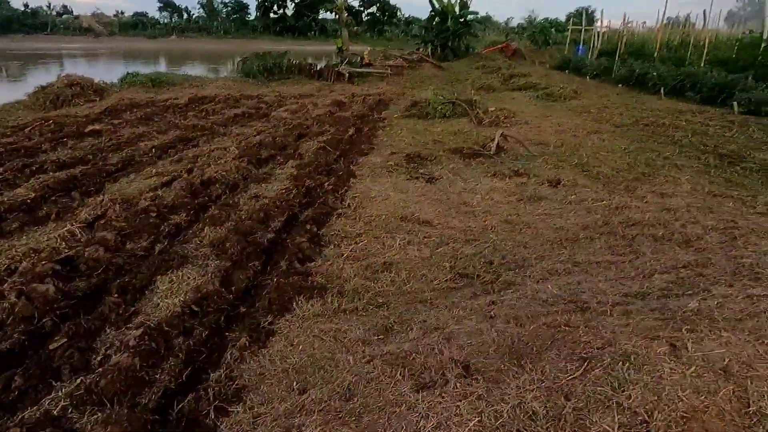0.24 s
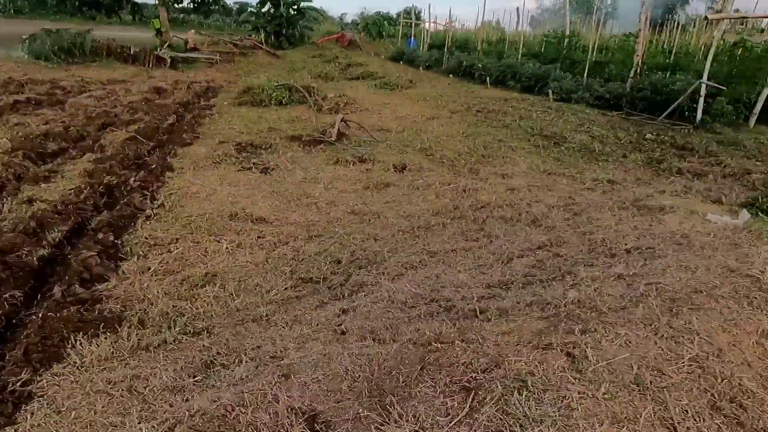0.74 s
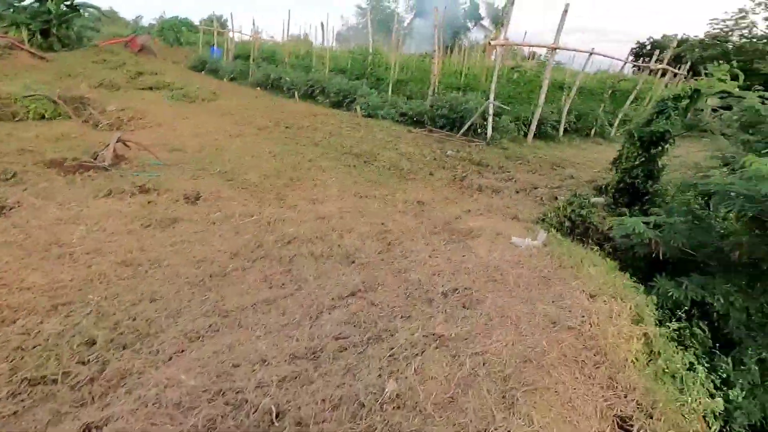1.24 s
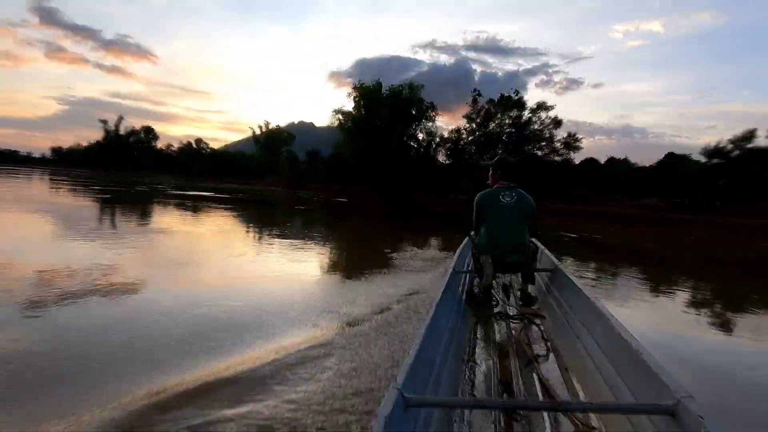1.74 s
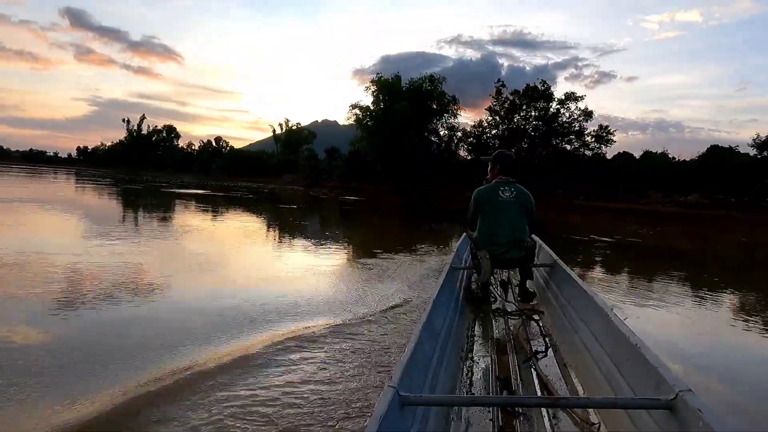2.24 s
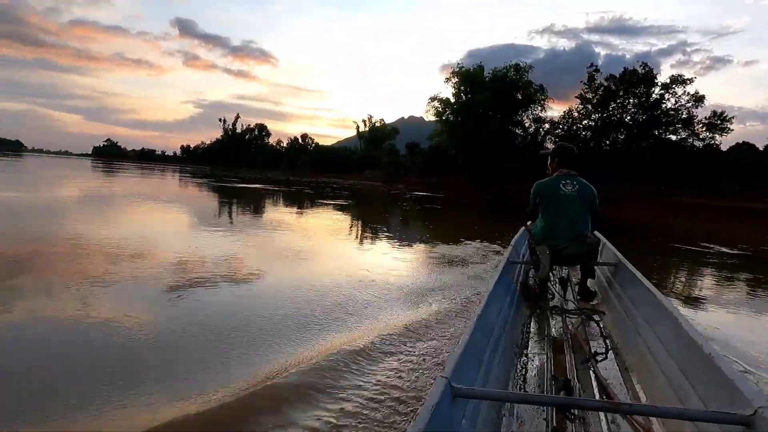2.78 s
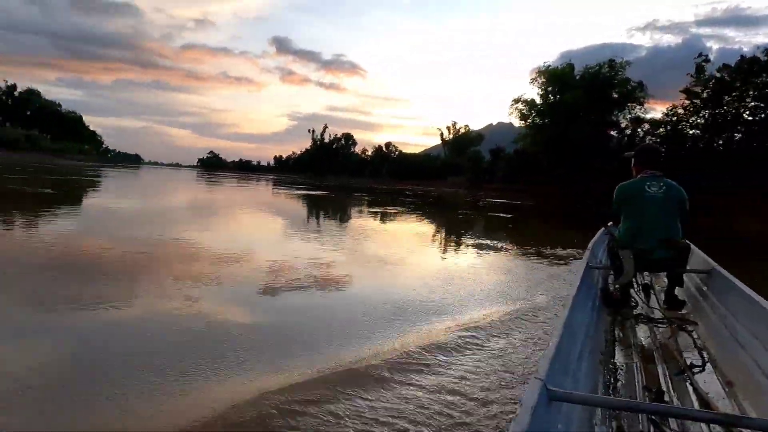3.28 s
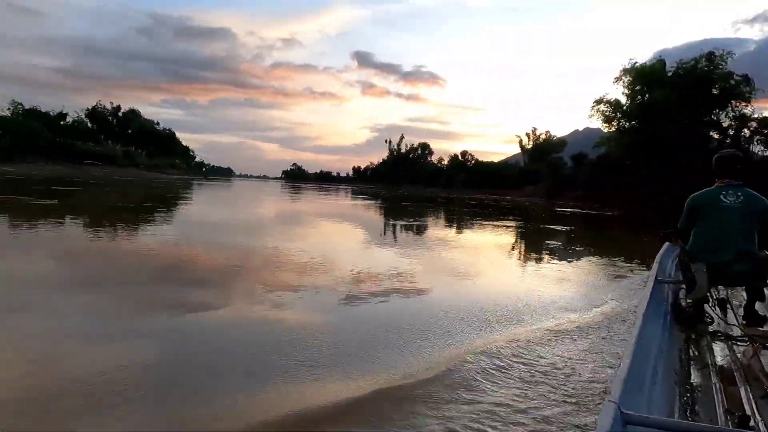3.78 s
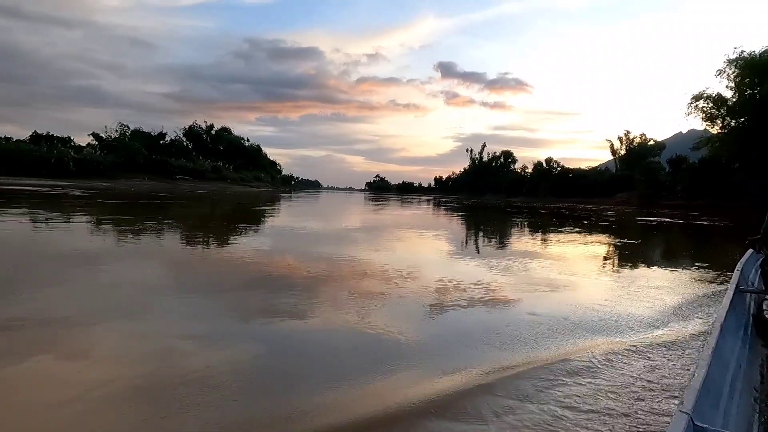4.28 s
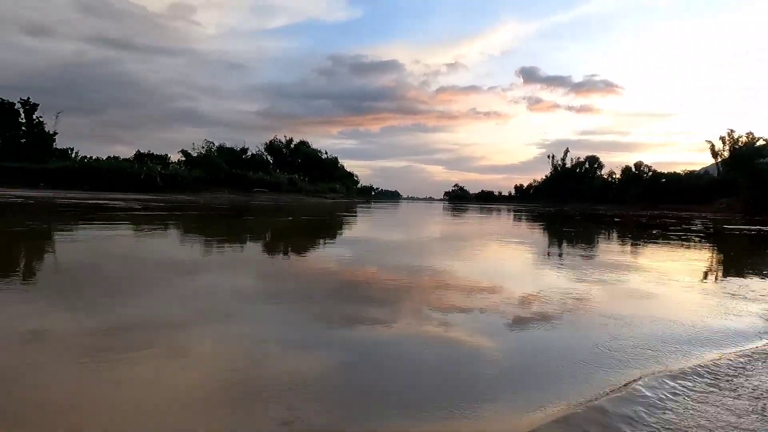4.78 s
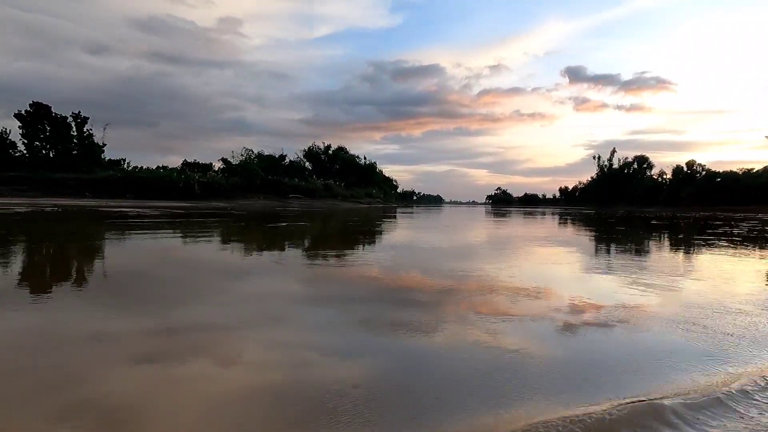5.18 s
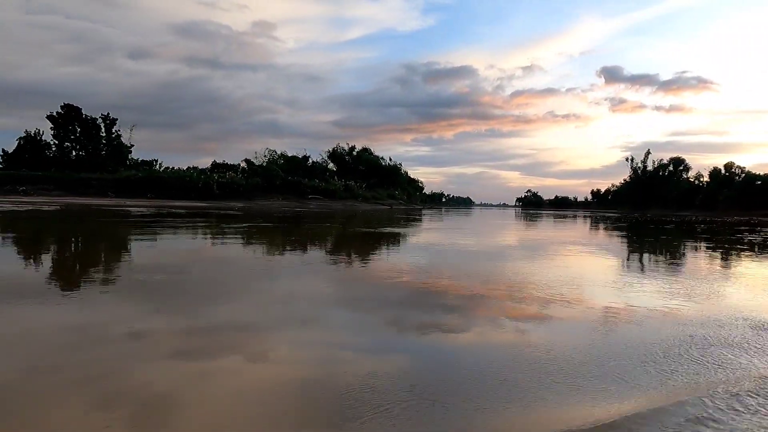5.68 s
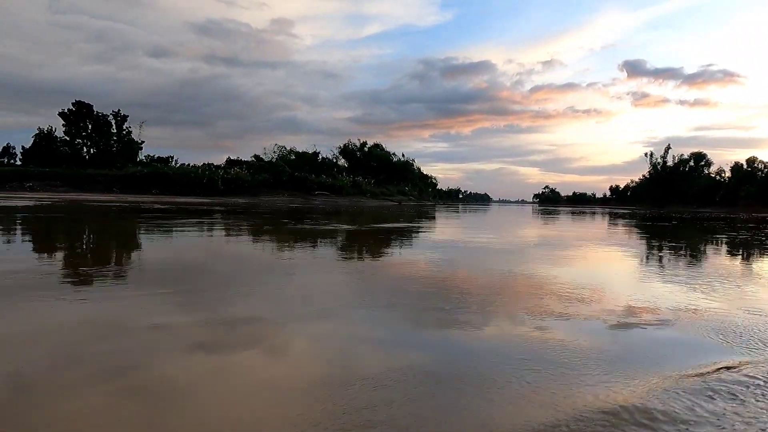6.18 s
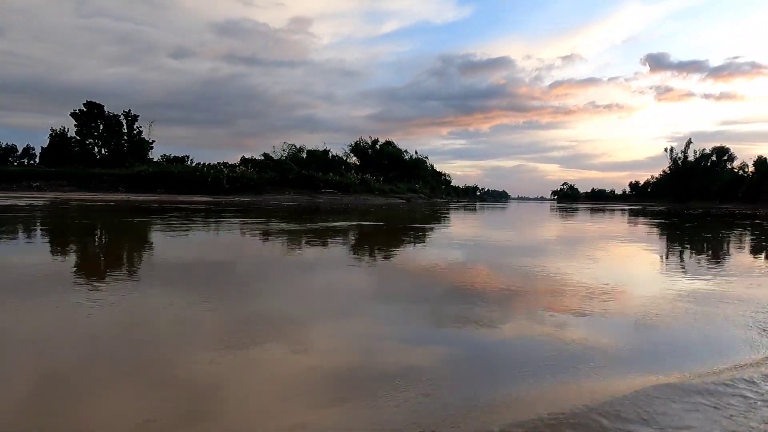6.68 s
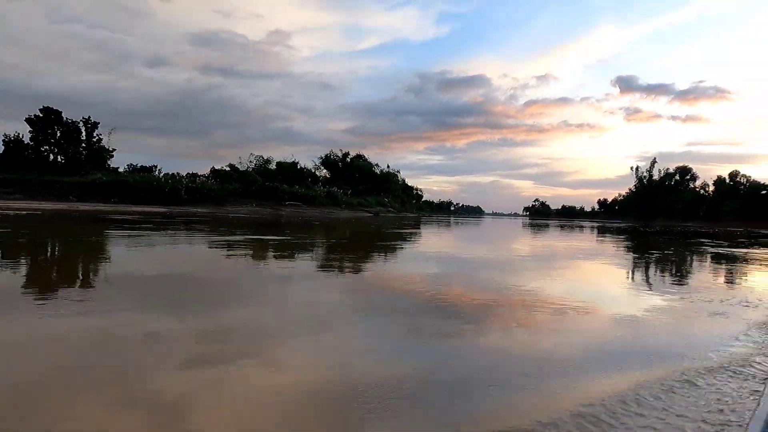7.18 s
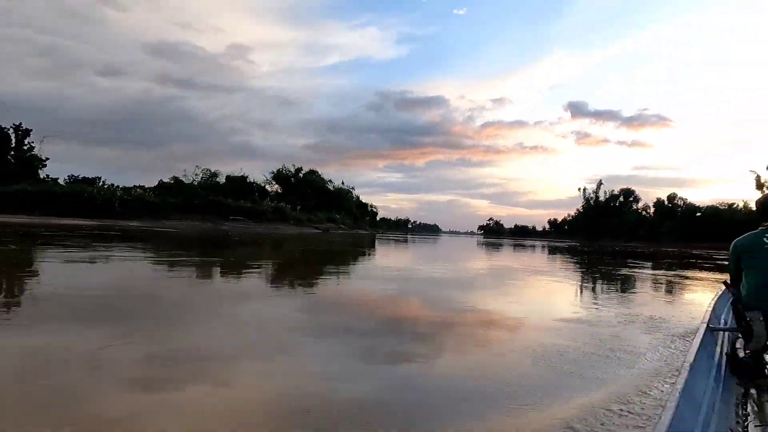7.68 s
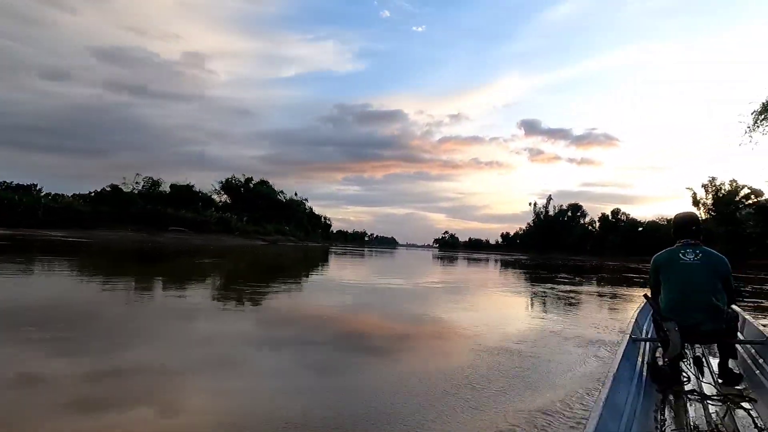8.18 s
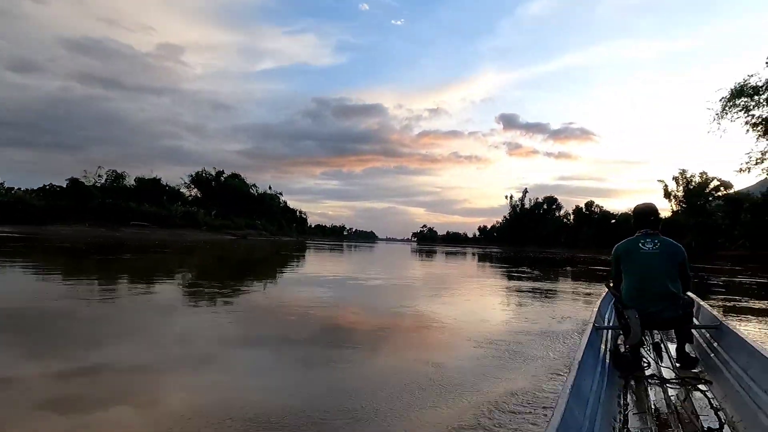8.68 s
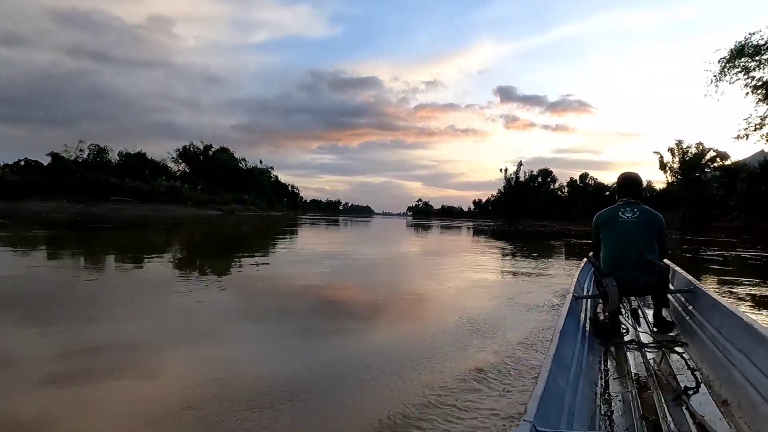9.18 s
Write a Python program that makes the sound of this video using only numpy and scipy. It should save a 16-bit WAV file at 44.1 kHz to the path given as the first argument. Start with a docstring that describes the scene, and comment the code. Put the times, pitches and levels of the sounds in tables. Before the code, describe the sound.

From 0 to 1.5 seconds, an open dry field: low wind gusts thump and buffet the microphone, strongest near 0.35, 0.5 and 1.3 seconds. Feet brush straw; crisp crunches with dull thuds and woody knocks come at about 0.26 and 0.36, then 0.86, a scatter from 1.0 to 1.15, and the heaviest around 1.26. Faint insect hiss and short downward chirps sit behind, the chirps mostly before 0.75. At 1.5 the field cuts off; silence until 1.7. Then a loud, close single-cylinder boat engine fades in within a moment, chugging about 17 times a second: hard knocks ringing through block and hull, deep exhaust booms, raspy hissing puffs, tapping valves and tinny clatter. Its pace wobbles from 3.6 to 4.5, with a brief hollow swell near 4.27. It continues steadily, the early hull ring fading, drifting gently left and widening after 7, until 9.4.

```python
"""A narrow river boat: its single-cylinder engine chugs about 17 times a second, with a stumble near four seconds.
Each firing rings the block and hull, then the exhaust booms and spits shaped noise; valve taps come in between.
Before the boat, steps knock and scuff over a dry, mown field: short bursts of snaps and thuds set off resonances.
Noise with changing levels makes the wind on the microphone, straw and insects; sliding tones make the chirps.
The field stops abruptly, and after a short silence the boat fades in."""
import sys
import numpy as np
from scipy import signal
from scipy.fft import rfft, irfft
from scipy.io import wavfile
from scipy.ndimage import uniform_filter1d, map_coordinates

SR = 44100
rng = np.random.default_rng(int(sys.argv[2]) if len(sys.argv) > 2 else 0)


def generate_wav(signal):
    """Clip the signal to [-1, 1] and save it as 16-bit WAV at the path in sys.argv[1]."""
    frames = np.transpose(np.atleast_2d(signal))
    scaled = np.clip(frames, -1, 1) * 32767
    pcm = np.round(scaled).astype(np.int16)
    wavfile.write(sys.argv[1], SR, pcm)


N = 416304
T = np.arange(N) / SR   # time of every sample, s

# Slow changes of the engine's loudness. Each row: time in seconds, gain of the knock, boom and roar in dB,
# rasp level in dB, hiss level in dB, sizzle level in dB.
ENGINE_LEVELS = [(1.75, 1.3, -26, -39, -82), (3.6, 0.5, -30, -36, -59), (4.9, -0.1, -30, -33.5, -55.5),
                 (6.0, 0.95, -27, -34, -59), (7.5, 0.24, -32.5, -36, -57.5), (8.4, -0.6, -30, -36.7, -59.5),
                 (9.44, -0.3, -31.5, -37, -62)]
# Tone of the clatter between puffs. Each row: frequency in Hz, relative strength in dB per Hz.
CLATTER_SPECTRUM = [(20, -12), (50, -3), (100, 2), (180, 5), (300, 2), (400, -7.5), (600, -2), (750, -9),
                    (930, -5.5), (1100, -9), (1700, -15), (2450, -16.5), (4000, -27.5), (7000, -38.5),
                    (15000, -64)]


def engine():
    """Every firing starts a knock, a boom, gas noise and taps, while the crank shakes the boat."""
    # Engine speed. Each row: time in seconds, firings per second.
    speed_curve = [(1.7, 17.156), (2.62, 17.001), (2.81, 17.134), (3.57, 17.122), (3.77, 16.674),
                   (4.09, 17.539), (4.41, 16.66), (4.51, 17.219), (5.06, 16.96), (5.14, 17.166),
                   (6.24, 17.255), (6.44, 16.933), (6.63, 17.271), (6.87, 16.896), (7.17, 17.102),
                   (9.44, 17.172)]
    # The engine moves left as the microphone turns. Each row: time in seconds, left minus right in dB.
    bearing = [(0, 0), (6.7, 0), (7.2, 1.06), (8.2, 1.6), (9.44, 3)]
    first_firing_s = 1.76
    speed, = in_time(speed_curve)
    left_db, = in_time(bearing)
    boom_db = in_time(ENGINE_LEVELS)[0]
    cycle = np.cumsum(speed) / SR
    cycle = cycle - np.interp(first_firing_s, T, cycle)   # whole numbers mark the firings
    fired = cycle - 0.00058 * speed   # the blow lands 0.58 ms later

    blows = from_db(boom_db) * (hull_knock(fired) + exhaust_boom(fired, speed))
    shake = from_db(-34.5) * np.sin(2 * np.pi * 2 * cycle)   # the crank turns twice for each firing
    taps = valve_gear(cycle, speed)
    loose = from_db(-23.5) * clatter(cycle, ticks_per_s=500, tick_share=0.53, tin_db=-24)
    # As the engine moves off to one side, its sound spreads wider.
    gas = gas_noise(cycle, speed, width=0.45 * left_db)
    side = from_db(-38.5) * left_db * colour(rng.standard_normal(N), CLATTER_SPECTRUM)
    scattered = side * np.array([[1], [-1]])

    left, right = blows + shake + taps + loose + gas + hollow_swell() + scattered
    left = np.interp(T - 1.2e-5 * left_db, T, left)   # the left side falls slightly late
    return np.array([left, right]) * from_db(left_db * [[.5], [-.5]])


def hull_knock(fired):
    """Combustion strikes the block and hull, which ring at their own pitches."""
    # Block and hull. Each row: pitch in Hz, width in Hz (wider dies sooner), swing (negative = inwards first).
    block_modes = [(261, 44.7, -0.4), (302.8, 15.5, -0.063), (410.2, 11.2, -0.0166), (580, 49, -0.037),
                   (723, 120, -0.073), (825, 86, -0.13), (873.6, 18, -0.018), (942.3, 105, 0.12),
                   (976, 30, 0.032), (1234, 177, 0.072)]
    # A low hull ring heard while the microphone looks along the boat.
    # Each row: pitch in Hz, width in Hz, swing.
    hull_modes = [(289, 50, -0.041), (640, 90, -.04), (770, 97, -0.12)]
    # Its share of the knock. Each row: time in seconds, gain in dB.
    hull_level = [(1.7, 1.5), (2.7, -2.5), (3.5, -12), (5, -20), (9.44, -20.5)]
    combustion = stroke(fired, spread_db=0.12)
    hull_gain = from_db(in_time(hull_level)[0])
    return ring(combustion, block_modes) + hull_gain * ring(combustion, hull_modes)


def exhaust_boom(fired, speed):
    """A little after the knock, a pulse of gas makes the exhaust pipe and silencer ring."""
    # Pipe and silencer. Each row: pitch in Hz, width in Hz, swing.
    pipe_modes = [(74.8, 40.5, 0.2), (160.2, 81, -0.88), (187.4, 12.1, -0.048), (360.3, 12, -0.012),
                  (493, 110, 0.046)]
    lag_s = 0.00818
    return ring(stroke(fired - lag_s * speed, spread_db=0.66), pipe_modes)


def gas_noise(cycle, speed, width):
    """Each puff roars, rasps, hisses and sizzles, with a strength and metallic colour that keep changing."""
    # The puff's rolling tail inside the hull. Each row: frequency in Hz, relative strength in dB per Hz.
    roar_spectrum = [(70, -8), (170, 6), (310, -1), (400, -3.5), (520, 1), (700, -0.5), (900, -4),
                     (1150, -13), (2000, -32)]
    # Rasp, hiss and sizzle of the gas. Each row: frequency in Hz, relative strength in dB per Hz.
    rasp_spectrum = [(500, -9), (900, -7.5), (1100, -5), (1350, -4), (1700, -10), (2100, -6), (2600, -17),
                     (3500, -16.5), (6000, -42.5)]
    hiss_spectrum = [(1410, -30.5), (2400, -1.5), (2850, -9), (3220, -5), (4270, -6), (4970, -11),
                     (6420, -16), (8120, -26), (11500, -35.5), (15000, -69.5), (22000, -120)]
    sizzle_spectrum = [(8000, -25), (10000, -9), (11500, -16.5), (12600, 0), (13800, -7), (15200, -8)]
    boom_db, rasp_db, hiss_db, sizzle_db = in_time(ENGINE_LEVELS)
    roar_db = -24 + boom_db

    roar = from_db(roar_db) * noise(roar_spectrum, 0.31 * width)
    roar = roar * puff(cycle, speed, lag_s=0.006, rise_s=0.015, fall_s=0.026, spread_db=0.6)
    rasp = from_db(rasp_db) * noise(rasp_spectrum, width)
    rasp = rasp * puff(cycle, speed, lag_s=0.0072, rise_s=0.0062, fall_s=0.0064, spread_db=1.0)
    hiss = from_db(hiss_db) * noise(hiss_spectrum, width)
    hiss = hiss * puff(cycle, speed, lag_s=0.0072, rise_s=0.0037, fall_s=0.0088, spread_db=1.85)
    sizzle = from_db(sizzle_db) * noise(sizzle_spectrum, 0.71)
    sizzle = sizzle * puff(cycle, speed, lag_s=0.0096, rise_s=.004, fall_s=.007, spread_db=1.2)
    sizzle = sizzle * from_db([[3.5], [-6]])   # louder on the left
    return roar + knotted(rasp + hiss + sizzle, knot_db=4.0, width_hz=190.3, last_s=.07)


def valve_gear(cycle, speed):
    """Valves and rocker tap at the same few moments of every cycle, and ring."""
    # The taps. Each row: seconds after firing (negative = before), strength.
    taps = [(-.0075, .4), (-.001, .6), (.0245, 1.0), (.036, .35), (.047, .4)]
    # What they ring with. Each row: pitch in Hz, width in Hz, swing.
    rocker_modes = [(462.4, 90, 0.057), (576, 190, -0.038), (900, 85, 0.047), (1136, 265, 0.052),
                    (1422, 140, -0.0094)]
    force = sum(strength * stroke(cycle - s * speed, spread_db=2.5) for s, strength in taps)
    return ring(force, rocker_modes)


def clatter(cycle, ticks_per_s, tick_share, tin_db):
    """Loose ticks of the valve gear in a wash of engine and water noise, with thin metal ringing along."""
    # Thin metal parts that keep ringing. Each row: pitch in Hz, width in Hz, relative swing.
    tin_modes = [(2467, 74, 0.98), (3140, 49, 0.58)]
    ticks = rms_one((rng.random(N) < ticks_per_s / SR) * rng.standard_normal(N))
    force = tick_share * ticks + rng.standard_normal(N)
    tin = from_db(tin_db) * rms_one(ring(force, tin_modes))
    swell = 1 + 0.074 * np.cos(2 * np.pi * (cycle + 0.13))   # busiest around compression
    return swell * (colour(force, CLATTER_SPECTRUM) + tin)


def hollow_swell():
    """A narrow band of noise swells briefly as the engine slows."""
    # The swell. Each row: peak time in seconds, rise in seconds, fall in seconds, level in dB.
    swell_events = [(4.265, 0.037, 0.034, -24)]
    # Its tone. Each row: frequency in Hz, relative strength in dB per Hz.
    swell_spectrum = [(560, -28), (670, -2), (720, -3), (770, 1), (860, -29)]
    return surges(swell_events) * colour(rng.standard_normal(N), swell_spectrum)


def field():
    """Steps, straw, insects, wind and open air add up in the air over the field."""
    return steps(ring_q=11) + straw() + insects() + wind() + open_air()


def steps(ring_q):
    """A soft thud, a woody ring, and a dying cluster of tiny snaps as dry stalks give way."""
    # Steps and scuffs. Each row: start in seconds, length of the snapping in seconds, crunch peak level in dB,
    # thud gain in dB, pitch of the woody ring in Hz, peak level of that ring in dB.
    step_events = [(0.26, 0.0035, -19.5, -8.5, 700, -27), (0.311, 0.0072, -43, -37, 650, -33),
                   (0.359, 0.011, -24.5, -13, 1140, -34), (0.706, .006, -43, -33, 1310, -47),
                   (0.748, 0.024, -41, -36, 680, -42), (0.857, 0.0084, -25, -11, 664, -36),
                   (0.884, .005, -37, -16, 580, -32), (1.011, 0.014, -33, -19, 2790, -30),
                   (1.019, 0.0056, -31, -30, 1880, -26.5), (1.047, 0.0056, -37, -15, 980, -35),
                   (1.069, 0.007, -35, -19, 800, -43), (1.089, 0.0084, -34, -15, 2000, -48),
                   (1.153, 0.03, -29, -30, 950, -31), (1.25, 0.0074, -27, -23, 2720, -30),
                   (1.262, 0.016, -18, -0.5, 564, -27), (1.281, 0.011, -25, -5.5, 1480, -35),
                   (1.419, 0.002, -56, -25.5, 900, -50)]
    # What the snaps ring with. Each row: pitch in Hz, width in Hz, relative swing.
    crunch_modes = [(650, 330, 0.34), (1110, 260, -0.056), (1830, 470, 0.18), (2240, 350, -0.16),
                    (2790, 1100, 0.29), (3660, 800, -0.076), (4380, 600, 0.076), (6050, 2900, -0.085)]
    # What the thud rings with. Each row: pitch in Hz, width in Hz, swing.
    thud_modes = [(85, 78, 0.8), (215, 137, -0.58), (374, 320, 0.35)]
    out = np.zeros((2, N))
    t = T[:SR // 5]
    for s, length_s, crunch_db, thud_db, ring_hz, ring_db in step_events:
        fading = np.exp(-(t / max(length_s, .002)) ** 1.18)
        snaps = rng.standard_normal(len(t)) * (rng.random(len(t)) < 7000 / SR) * fading
        crunch = from_db(crunch_db) * top_one(ring(snaps, crunch_modes))
        wood = from_db(ring_db) * top_one(ring(snaps, [(ring_hz, ring_hz / ring_q, 1)]))
        thud = from_db(thud_db) * ring(1.0 * (t == 0), thud_modes)   # one single blow
        start = round(s * SR)
        # The crunch leans left, the thud right.
        out[:, start:start + len(t)] += (crunch + wood) * from_db([[.5], [-.5]])
        out[:, start:start + len(t)] += thud * from_db([[-2.5], [2.5]])
    return out


def straw():
    """Feet brush through straw, which also stirs quietly between strides."""
    # Brushes. Each row: peak time in seconds, rise in seconds, fall in seconds, level in dB.
    brush_events = [(.235, .06, 0.064, -37.5), (.335, 0.038, 0.038, -37), (.49, 0.083, 0.094, -42),
                    (.755, .025, .02, -43.5), (.97, 0.064, 0.07, -40), (1.17, 0.048, 0.032, -42),
                    (1.27, 0.022, .015, -43)]
    # Tone of the straw. Each row: frequency in Hz, relative strength in dB per Hz.
    straw_spectrum = [(300, 8.5), (800, 8.5), (1400, -2), (3000, -1.5), (6000, -6.5), (9000, -12.5),
                      (11000, -14), (14000, -33.5), (16000, -30)]
    stirring_db = -62
    return np.hypot(from_db(stirring_db), surges(brush_events)) * noise(straw_spectrum, 0.51)


def insects():
    """Many insects blur into a band of hiss, with single chirps on top."""
    # Level of the hiss, which dips briefly. Each row: time in seconds, level in dB.
    insect_level = [(0, -56.5), (.5, -57.5), (.8, -63), (1.25, -60.5), (1.32, -74), (1.46, -78),
                    (1.5, -58.5)]
    # Its tone. Each row: frequency in Hz, relative strength in dB per Hz.
    insect_spectrum = [(3800, -36), (4600, -8), (5000, -5), (5600, -22), (6700, -17), (7350, 0.5),
                       (7800, -3), (8400, -22.5), (10500, -10.5), (12000, -28.5)]
    insect_db, = in_time(insect_level)
    hiss = from_db(insect_db) * noise(insect_spectrum, .5)
    return hiss + chirps(top_hz=5500, bottom_hz=4550, length_s=0.025)


def chirps(top_hz, bottom_hz, length_s):
    """Short, slightly husky notes from the grass slide down, evenly spaced within a phrase."""
    # Phrases. Each row: start in seconds, number of notes, level in dB.
    phrases = [(.16, 3, -45), (.377, 3, -45), (.524, 2, -50.5), (.624, 3, -53)]
    gap_s = .0345   # from the start of one note to the next
    out = np.zeros(N)
    t = T[:int(length_s * SR)]
    note = signal.chirp(t, top_hz, length_s, bottom_hz) * np.sin(np.pi * t / length_s)
    for s, notes, db in phrases:
        for k in range(round(notes)):
            start = int((s + k * gap_s) * SR)
            out[start:start + len(t)] += from_db(db) * note
    flutter = rms_one(uniform_filter1d(rng.standard_normal(N), size=80))
    return out * (1 + 0.46 * flutter)


def wind():
    """Gusts rumble on the microphone's two ports; the harder they blow, the more they buffet."""
    # Gusts. Each row: peak time in seconds, rise in seconds, fall in seconds, rumble level in dB.
    gust_events = [(.005, .02, 0.033, -27), (.345, 0.016, .035, -17), (.52, 0.11, 0.057, -12),
                   (.69, 0.029, 0.075, -21.5), (.88, 0.016, 0.044, -23), (1.1, 0.11, 0.11, -21),
                   (1.275, 0.023, 0.033, -14)]
    # Tones of the rumble and the buffeting. Each row: frequency in Hz, relative strength in dB per Hz.
    rumble_spectrum = [(15, -9), (35, 1), (70, 2), (110, 2.5), (160, -2.5), (300, -50)]
    buffet_spectrum = [(80, -15.5), (140, 6.5), (220, 1), (340, -8.5), (500, -17), (800, -29), (1500, -43)]
    breeze_db, buffet_db = -35.5, -41.5   # rumble and buffeting between gusts
    buffet_growth = 1.186   # dB of buffeting gained per dB of rumble
    flow = np.hypot(1, surges(gust_events) / from_db(breeze_db))
    rumble = from_db(breeze_db) * flow * noise(rumble_spectrum, 0.51)
    buffet = from_db(buffet_db) * flow ** buffet_growth * noise(buffet_spectrum, 0.66)
    return rumble + buffet * from_db([[-1.5], [1.5]])


def open_air():
    """Far open air over the field is a steady, soft noise."""
    # Its tone. Each row: frequency in Hz, relative strength in dB per Hz.
    air_spectrum = [(200, 15), (500, 7), (900, -2.5), (1500, -4), (3300, -14.5), (5000, -13.5), (7000, -32),
                    (12000, -40)]
    return from_db(-48.5) * noise(air_spectrum, 0.44)


def stroke(cycle, spread_db):
    """One click a cycle, never quite equally strong."""
    clicks = np.diff(np.floor(cycle), prepend=np.floor(cycle[0]))
    return clicks * per_firing(cycle, spread_db)


def puff(cycle, speed, lag_s, rise_s, fall_s, spread_db):
    """Gas flow that peaks a little after each firing and trails off; rms 1."""
    shifted = cycle - lag_s * speed + .5
    since = (shifted % 1 - .5) / speed   # seconds since the nearest peak, negative before it
    flow = np.exp(np.where(since < 0, since / rise_s, -since / fall_s))
    return rms_one(flow * per_firing(shifted, spread_db))


def per_firing(cycle, spread_db):
    """A random gain for every turn of the cycle, from a list of 256."""
    turn = np.floor(cycle).astype(int)
    gains = from_db(spread_db * np.clip(rng.standard_normal(256), -2, 2))
    return gains[turn % 256]


def ring(force, modes):
    """Damped resonances that swell for a moment and then die away."""
    t = T[:SR // 5]
    response = np.zeros(len(t))
    for hz, width, swing in modes:
        swell = np.pi * width * t * np.exp(1 - np.pi * width * t)   # peaks at 1
        response += swing * swell * np.sin(2 * np.pi * hz * t)
    return signal.oaconvolve(force, response)[:len(force)]


def knotted(x, knot_db, width_hz, last_s):
    """Louder and softer patches come and go in a noise, each some hertz wide and lasting a while."""
    hz, s, bins = signal.stft(x, SR, nperseg=512)
    chance = np.clip(rng.standard_normal((256, 512)), -2, 2)
    places = np.meshgrid(hz / width_hz, s / last_s, indexing="ij")
    knots = map_coordinates(chance, places, order=1, mode="wrap")
    gain = rms_one(from_db(knot_db * rms_one(knots)))
    return signal.istft(bins * gain, SR, nperseg=512)[1][..., :N]


def surges(rows):
    """Summed gain, by power, of events that each swell to a peak and fall away."""
    power = np.zeros(N)
    for s, rise_s, fall_s, db in rows:
        distance = np.abs((T - s) / np.where(T < s, rise_s, fall_s))
        power += (from_db(db) * np.exp(-np.minimum(distance, 30) ** 0.9)) ** 2
    return np.sqrt(power)


def noise(spectrum, width):
    """Stereo noise; width is the size of the side against the middle."""
    mid, side = colour(rng.standard_normal((2, N)), spectrum)
    return mid + width * side * np.array([[1], [-1]])


def colour(x, spectrum):
    """Give a steady noise a spectrum, with a drop beyond both ends; rms 1."""
    hz, db = np.transpose(spectrum)
    bins = np.maximum(np.arange(N // 2 + 1) * SR / N, 1)
    bin_db = np.interp(np.log(bins), np.log(hz), db, left=db[0] - 20.5, right=db[-1] - 26.5)
    return rms_one(irfft(rfft(x) * from_db(bin_db), N))


def in_time(rows):
    """Each column of a curve at every sample."""
    s, *columns = np.transpose(rows)
    return [np.interp(T, s, c) for c in columns]


def from_db(db):
    """Decibels to gain."""
    return 10 ** (np.asarray(db) / 20)


def rms_one(x):
    """Scale to unit power."""
    return x / np.sqrt(np.mean(x ** 2) + 1e-20)


def top_one(x):
    """Scale so that the loudest few milliseconds have unit power."""
    return x / np.sqrt(uniform_filter1d(x ** 2, size=256).max() + 1e-20)


def scene():
    """The field stops dead; after a pause the boat fades in."""
    field_ends_s, boat_starts_s = 1.508, 1.70
    afloat = np.clip((T - boat_starts_s) / 0.057, 0, 1) ** 1.86
    on_land = np.clip((field_ends_s - T) / .003, 0, 1)
    return afloat * engine() + on_land * field()


def record(dry):
    """Peaks are rounded off near full scale, then the highest treble is cut."""
    cutoff_hz = 15445
    rounded = dry / (1 + np.abs(dry) ** 20) ** (1 / 20)
    treble_cut = signal.ellip(10, .03, 90, cutoff_hz, fs=SR, output="sos")
    return signal.sosfilt(treble_cut, rounded)


dry = scene()
out = record(dry)
generate_wav(out)
```